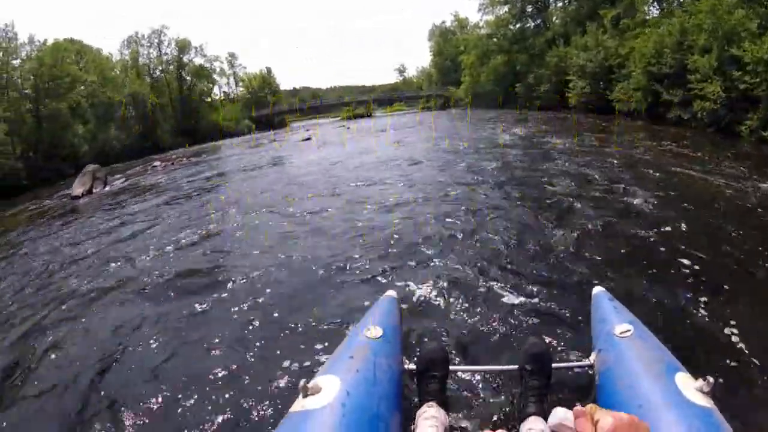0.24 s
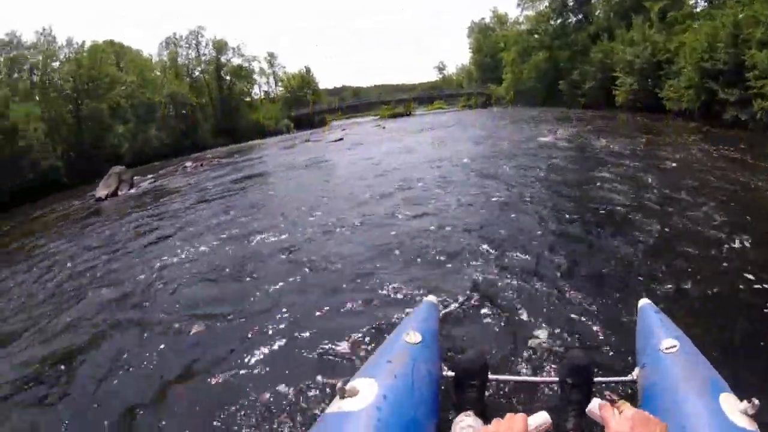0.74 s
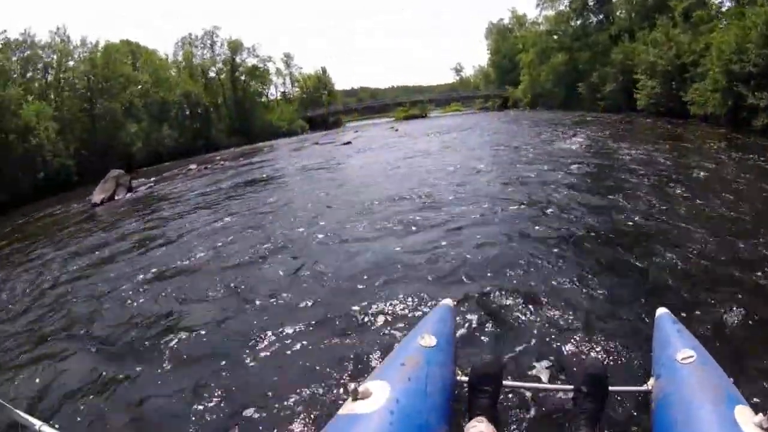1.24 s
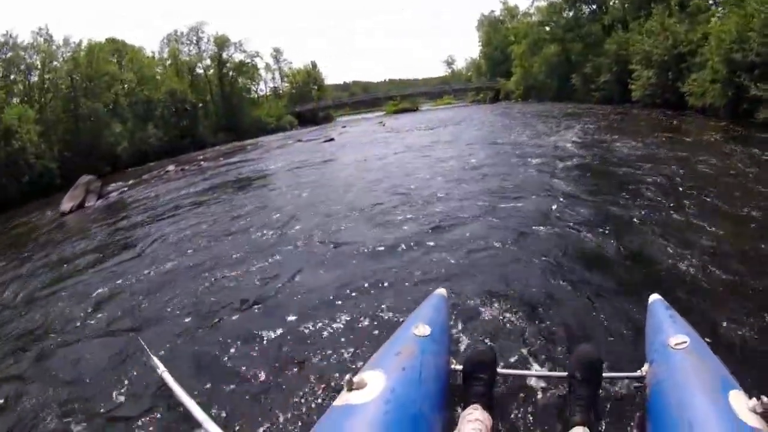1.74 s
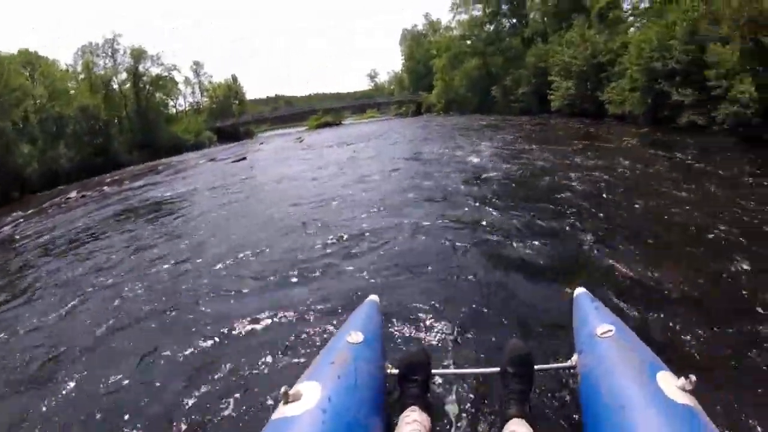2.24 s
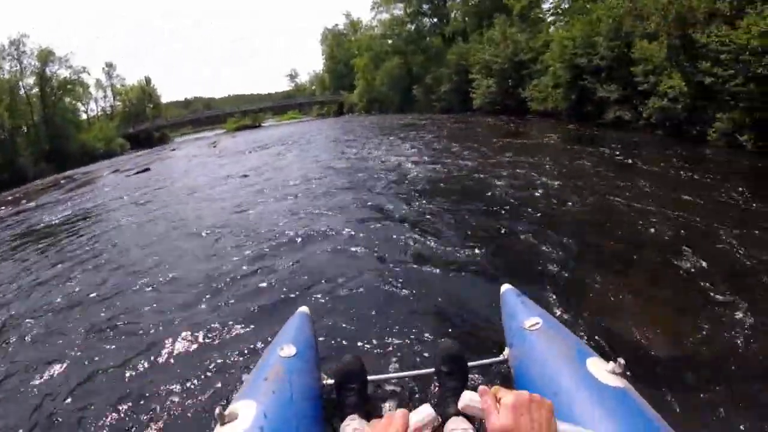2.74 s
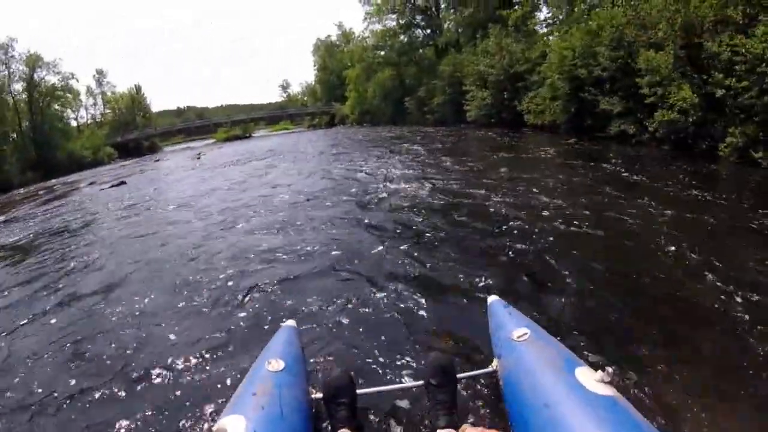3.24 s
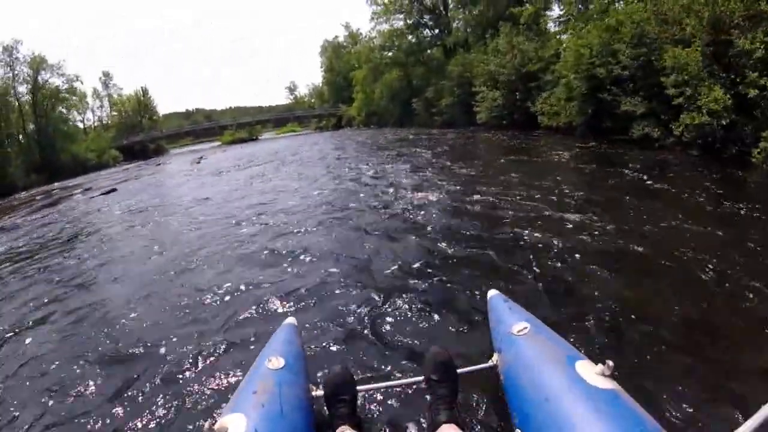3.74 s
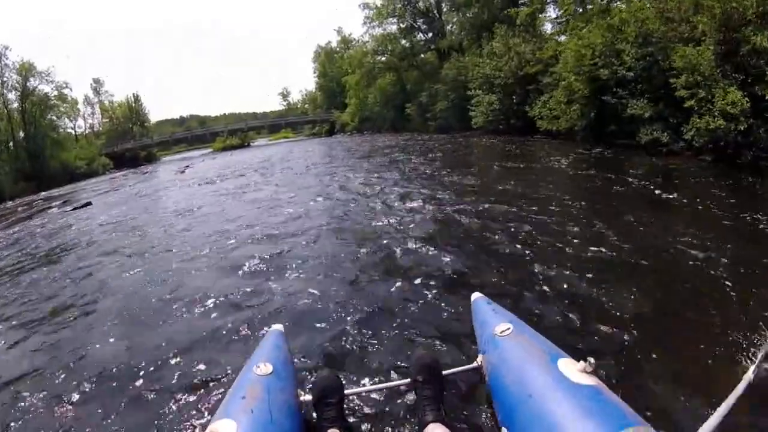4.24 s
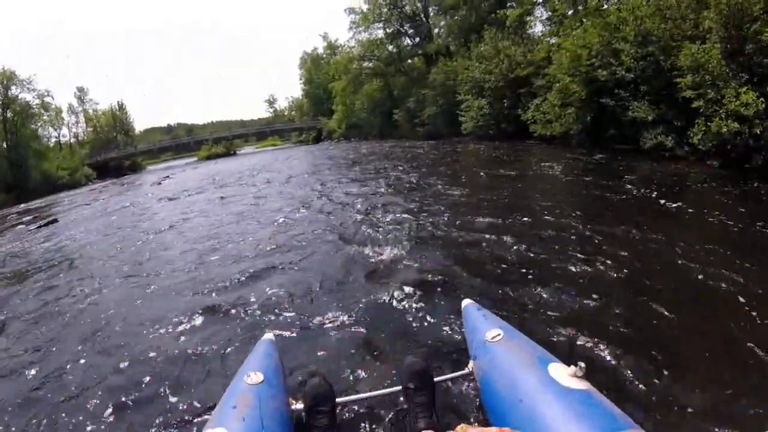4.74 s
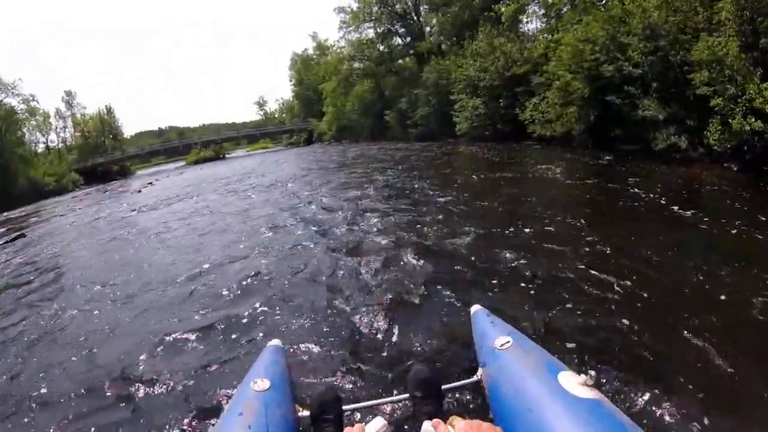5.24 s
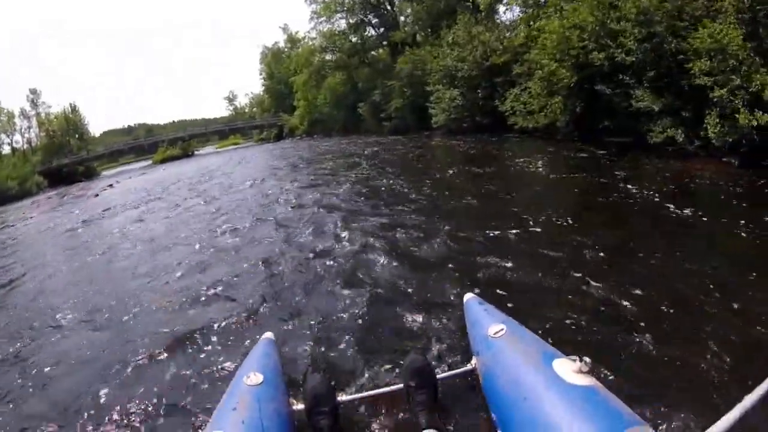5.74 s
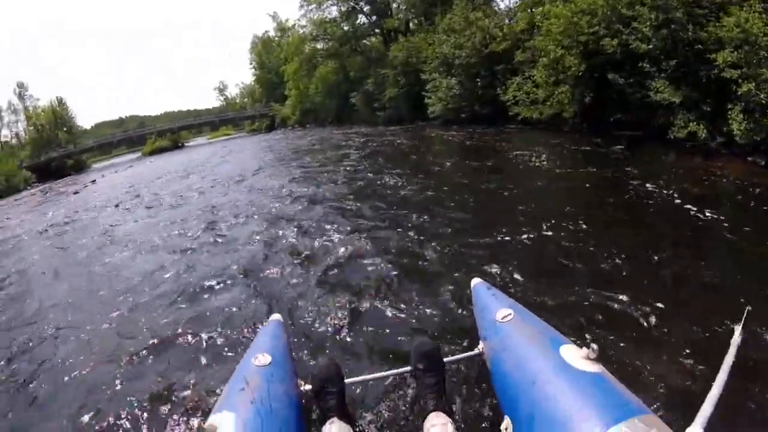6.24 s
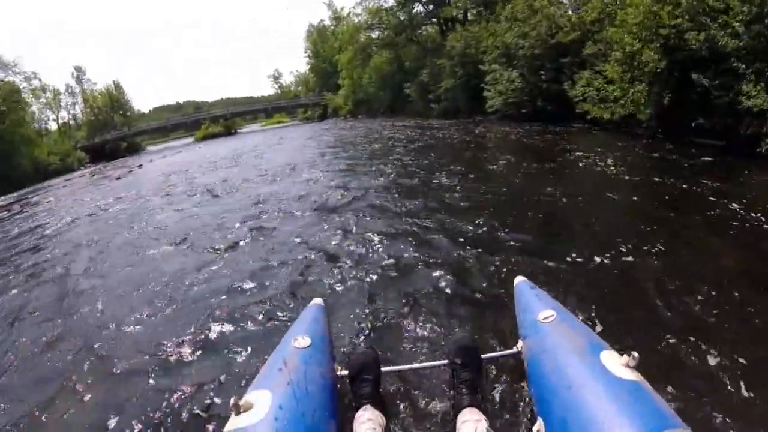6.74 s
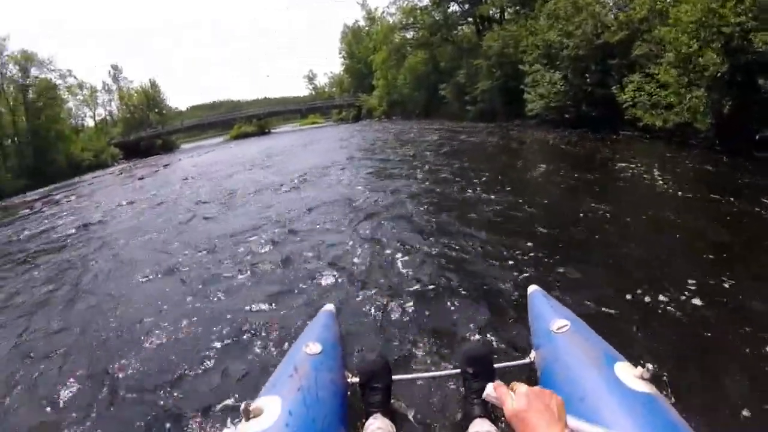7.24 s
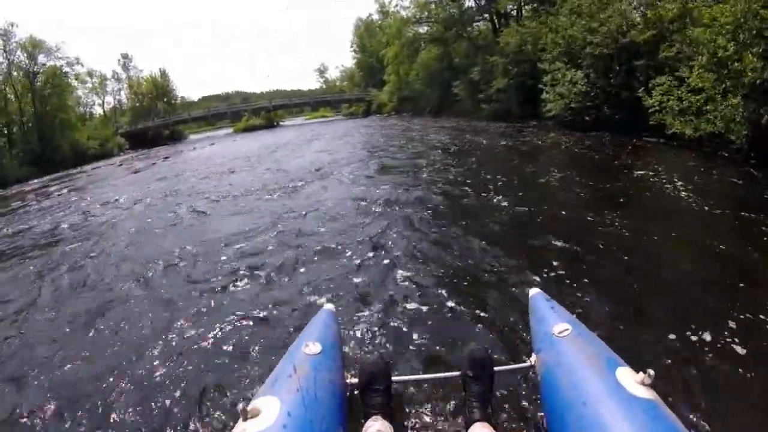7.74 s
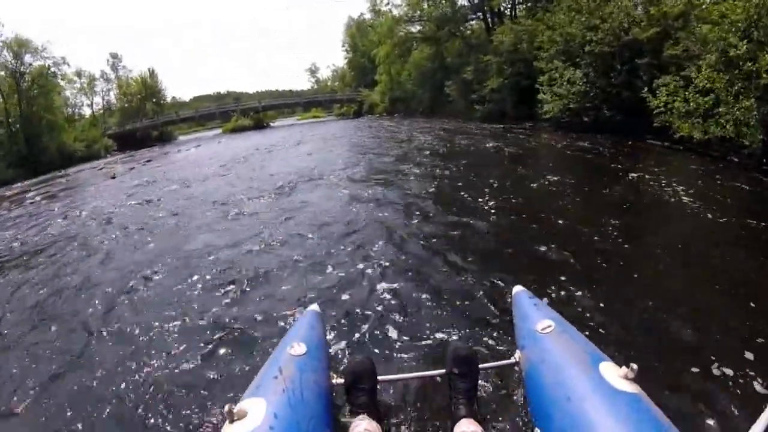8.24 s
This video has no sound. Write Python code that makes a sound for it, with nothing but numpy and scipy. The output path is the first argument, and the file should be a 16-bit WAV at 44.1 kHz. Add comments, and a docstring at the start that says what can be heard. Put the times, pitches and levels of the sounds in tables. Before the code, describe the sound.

Water gurgles, plops and ticks against a drifting inflatable boat over steady rushing current, with rumbling wind gusts and one small double click from an oar fitting.

```python
"""An even river rush, a low wind rumble and the first wavelets lapping an inflatable boat are heard at once.
Bubbles ring to make the gurgles, plops and crackling spray, most of all in one choppy run near six seconds.
Short noise bursts make slaps and near drops; the drops also ring a camera housing between about 5 and 6 kHz.
An oar fitting clicks once, as two quick contacts. The rush is patchy noise; the wind is low noise in gusts."""
import sys
import numpy as np
from scipy import signal
from scipy.fft import rfft, irfft, next_fast_len
from scipy.io import wavfile
from scipy.ndimage import uniform_filter1d, map_coordinates

SR = 44100
rng = np.random.default_rng(int(sys.argv[2]) if len(sys.argv) > 2 else 0)


def master(y):
    """Save y as 16-bit WAV."""
    cut = np.clip(np.atleast_2d(y).T, -1, 1)
    pcm = np.round(cut * 32767)  # scale
    wavfile.write(sys.argv[1], SR, pcm.astype(np.int16))


N = 374966  # length in samples, about 8.5 s

# In these tables, "relative" levels are shifted or rescaled further on.
# choppiness of the water round the boat: t/s, relative level/dB
CHOPPINESS = [(0, -55.5), (.3, -56.5), (.65, -54.5), (1.1, -60), (1.8, -59), (2.8, -65.5), (3.5, -61.5),
              (4.5, -58), (5.1, -56.5), (5.45, -57), (5.8, -56), (6.15, -46.5), (6.5, -51.5), (6.9, -53.5),
              (7.3, -55.5), (7.6, -53.5), (8.0, -59), (8.5, -58.5)]
# wavelets breaking on the pontoons: t/s of the peak, length/s,
# then relative level/dB of large bubbles, of small bubbles and of spray
WAVELETS = [(0.098, 0.13, -49.5, -45.5, -46.5), (0.418, 0.047, -46, -45, -47),
            (0.492, 0.057, -69, -47, -47.5), (0.584, 0.044, -71, -49, -48), (0.86, 0.068, -53, -48, -56),
            (1.29, 0.036, -53, -47, -48.5), (1.476, 0.031, -46.5, -47.5, -51),
            (1.557, 0.075, -53.5, -50, -51.5), (1.705, 0.18, -53, -54, -69),
            (1.894, 0.18, -48, -54.5, -53.5), (2.29, 0.06, -48, -60, -52.5),
            (2.527, 0.028, -61, -54.5, -51.5), (3.33, 0.061, -54, -62, -58),
            (3.42, 0.16, -57, -51.5, -54.5), (4.01, 0.13, -70, -51, -49), (4.213, 0.057, -53, -65, -45.5),
            (4.36, 0.027, -47.5, -58, -48), (4.505, 0.051, -48.5, -53, -50.5),
            (4.91, 0.064, -51.5, -46.5, -46), (5.03, 0.1, -55, -52.5, -48), (5.396, 0.036, -71, -75, -43),
            (5.556, 0.081, -56, -47.5, -44.5), (5.717, 0.06, -47, -49, -43), (5.784, 0.068, -40, -41, -40),
            (5.922, 0.041, -60, -45, -36.5), (5.975, 0.025, -34.5, -36.5, -33.5),
            (6.048, 0.083, -41, -44, -41.5), (6.17, 0.068, -46, -50, -46), (6.267, 0.15, -42, -41.5, -39.5),
            (6.53, 0.027, -57, -47, -42), (6.64, 0.052, -42.5, -43.5, -42.5),
            (6.722, 0.046, -40, -41.5, -39), (6.766, 0.04, -39, -42, -44), (7.003, 0.072, -43.5, -41, -42),
            (7.148, 0.067, -43, -40, -39.5), (7.422, 0.094, -51.5, -48, -42),
            (7.46, 0.099, -45, -44.5, -57), (7.643, 0.02, -46, -60, -46), (7.814, 0.028, -49, -50, -43.5),
            (7.872, 0.068, -45, -48, -49), (8.145, 0.14, -49, -58, -48.5), (8.357, 0.09, -55, -59, -51)]
# single bubbles, large and small, that stand out: t/s, f/Hz at the start, relative level/dB,
# life/cycles, share by which the pitch rises in that life
PLOPS = [(.030, 654, -29.5, 4.8, .15), (.122, 783, -37.5, 11, .1), (.4015, 1470, -37, 9.2, 0.092),
         (.493, 2080, -32, 16, 0.31), (0.543, 1900, -30, 8.4, .15), (.576, 3180, -42, 16, 0.13),
         (0.587, 1730, -40, 22, .05), (.596, 1850, -38, 12, .15), (.733, 726, -36.5, 11, .08),
         (.916, 696, -30.5, 8.3, 0.073), (0.916, 1130, -38.5, 11, .1), (1.490, 700, -31, 5.7, .15),
         (1.553, 477, -42, 40, .02), (1.560, 590, -34, 8.3, 0.19), (1.965, 1250, -38, 13, 0.058),
         (2.041, 1090, -37, 13.5, .4), (2.298, 1026, -40, 12, .1), (3.396, 3500, -41, 14, .15),
         (3.760, 613, -42.5, 24, 0.084), (3.968, 813, -39, 22, 0.13), (4.202, 400, -27.5, 2.9, .15),
         (4.261, 346, -36.5, 12.4, .03), (5.583, 1080, -32, 12, 0.28), (5.597, 1260, -26.5, 6.3, .05),
         (5.783, 604, -28, 9.5, 0.11), (5.799, 628, -17.5, 4.6, 0.22), (5.944, 262, -19.5, 2.3, 0.12),
         (5.95, 1280, -22.5, 10.6, 0.082), (5.963, 643, -27.5, 11.6, .05), (6.160, 546, -23.5, 3.7, 0.22),
         (6.227, 700, -32, 17, 0.045), (6.245, 394, -23, 4.3, 0.27), (6.278, 340, -37.5, 17, .1),
         (6.344, 1340, -19, 5.3, 0.11), (6.344, 2170, -18.5, 5.1, .2), (6.394, 3140, -31, 12, .2),
         (6.468, 1750, -41, 24, .3), (6.511, 743, -37, 19, 0.3), (6.522, 1080, -39, 14, .3),
         (6.535, 1380, -31.5, 17, 0.29), (6.550, 2150, -35, 14, .35), (6.562, 1650, -31, 8.2, .2),
         (6.645, 1004, -32, 19, 0.058), (6.712, 462, -30, 9.4, .05), (6.724, 2680, -32, 14, 0.14),
         (6.781, 577, -35, 13, .05), (7.007, 2000, -35, 19, 0.22), (7.110, 570, -34, 19, 0.14),
         (7.128, 1530, -34.5, 28, 0.26), (7.446, 970, -32, 11, .15), (7.483, 600, -31.5, 7, .15),
         (7.507, 1144, -34, 18, 0.81), (7.542, 513, -33.5, 9.9, .08), (7.572, 990, -38, 11, 0.33),
         (7.874, 503, -34.5, 15, .05), (7.910, 605, -31, 8.4, 0.13), (8.399, 665, -30, 8.9, .03)]
# water smacking the pontoons: t/s, middle of the band f/Hz, peak level/dB, time to fall 60 dB/s
SLAPS = [(0.4256, 3170, -29.5, 0.008), (1.860, 890, -29.5, 0.027), (4.333, 2000, -34, .018),
         (5.298, 3000, -36.5, .012), (5.7003, 4260, -32.5, 0.011), (5.928, 3500, -29, .012),
         (5.946, 790, -24, 0.017), (5.962, 3300, -24, .016), (6.278, 2600, -31, 0.016),
         (6.3435, 1900, -23, 0.01), (7.123, 1500, -32, 0.033)]
# drops landing close by: t/s, relative level/dB
DROPS = [(.426, -38), (.4895, -32), (.544, -41), (1.229, -43), (1.2425, -34), (1.305, -36), (1.539, -40),
         (1.989, -40), (2.1685, -37), (3.509, -43), (3.692, -40), (4.021, -42), (4.269, -38), (4.333, -39),
         (4.362, -33.5), (4.798, -38.5), (4.916, -29.5), (4.9555, -35), (5.2615, -35), (5.299, -39),
         (5.678, -32), (5.701, -36), (5.721, -32.5), (5.894, -40), (5.914, -39), (5.947, -20),
         (5.9625, -23), (5.9675, -31), (5.988, -30), (6.279, -29), (6.344, -31), (6.4725, -32.5),
         (6.627, -31), (6.717, -29), (7.059, -33.5), (7.125, -30), (7.164, -30), (7.729, -35),
         (8.118, -36.5), (8.379, -34)]
# ringing of the camera housing: f/Hz, relative level/dB, time to fall 60 dB/s
HOUSING_MODES = [(4970, 13.5, 0.006), (5340, 6.5, 0.011), (5717, 4.5, 0.023)]
# contacts of the oar fitting: t/s, relative level/dB
CLICKS = [(3.1315, -12), (3.1416, -1)]
# ringing of the oar fitting: f/Hz, relative level/dB, time to fall 60 dB/s
FITTING_MODES = [(1470, -30, 0.012), (5450, -30, 0.018), (5950, -29, 0.016), (7040, -40, 0.014),
                 (9300, -48, .02), (11060, -41, 0.02)]
# strength of the breeze at the microphone: t/s, relative level/dB
BREEZE = [(0, -41), (.6, -45.5), (1.0, -46), (1.75, -50), (2.1, -43.5), (2.45, -37.5), (2.7, -46.5),
          (3.05, -41.5), (3.35, -49), (3.8, -45), (4.55, -44), (5.3, -41), (5.8, -43), (6.3, -39),
          (6.8, -39.5), (7.1, -44.5), (7.75, -36.5), (8.5, -40)]
# gusts that thump the microphone: t/s of the peak, length/s,
# relative level/dB of the slow buffet and of the faster eddies
GUSTS = [(0.302, 0.044, -34, -54), (0.545, 0.051, -35.5, -55), (0.714, 0.11, -40.5, -48),
         (1.23, .05, -59, -66), (1.575, 0.019, -36.5, -50), (1.902, 0.034, -34, -33),
         (2.084, 0.055, -46, -37.5), (2.156, 0.03, -31, -36), (2.25, 0.033, -30, -57),
         (2.288, 0.035, -50, -45), (2.446, 0.046, -34, -58), (2.768, 0.035, -31, -51),
         (2.943, 0.032, -26, -34), (3.16, 0.045, -35, -44), (3.688, 0.056, -34, -46.5),
         (3.915, 0.08, -35, -44), (4.246, 0.033, -33, -51), (4.412, 0.019, -34.5, -37),
         (4.806, 0.064, -28, -37.5), (4.868, 0.082, -28.5, -41.5), (5.245, 0.05, -28, -30.5),
         (5.349, 0.084, -29, -33.5), (5.4, 0.044, -21, -29.5), (5.58, 0.13, -44, -38.5),
         (5.672, 0.034, -31.5, -35), (5.917, 0.028, -34, -37.5), (6.057, 0.054, -42, -32.5),
         (6.197, 0.042, -39, -38), (6.293, 0.033, -29, -31.5), (6.446, 0.027, -31, -47),
         (6.686, 0.051, -28.5, -33.5), (7.478, 0.034, -29, -52), (7.623, .035, -32, -45),
         (7.70, 0.036, -25, -49), (7.756, .04, -26, -33), (7.841, 0.053, -36, -34.5),
         (7.908, 0.037, -25.5, -31), (7.941, 0.03, -27.5, -28), (8.046, .04, -48, -36.5),
         (8.11, 0.039, -25.5, -38), (8.204, 0.037, -40, -34.5), (8.258, 0.042, -24.5, -44),
         (8.355, .03, -38, -48)]
# tone colours, from large bubbles to wind eddies: f/Hz, relative level/dB for each Hz of width
GURGLE_COLOUR = [(150, -14), (300, -8.5), (450, -7.5), (650, -4), (1100, -10.5), (1600, -8.5),
                 (3000, -42.5)]
TRICKLE_COLOUR = [(600, -12), (1250, -3.5), (2400, -2), (3900, -10), (6000, -11.5), (9000, -52)]
SPRAY_COLOUR = [(2000, -26), (3300, -10), (4100, -12), (4900, 3.5), (5500, 5), (6000, 3), (6600, -11),
                (8000, -13), (10700, -29), (12000, -36)]
MIST_COLOUR = [(4500, -22), (6500, -2), (8000, -5), (9500, -7), (11000, -11), (12500, -12)]
RUSH_COLOUR = [(120, 1.5), (270, -1.5), (380, -0.5), (600, 0.5), (850, 2), (1300, -3.5), (2500, -9),
               (4100, -20), (5000, -10), (5900, -11), (6700, -22.5), (10600, -33.5), (13500, -22.5)]
BUFFET_COLOUR = [(8, -12), (25, 1), (45, 1.5), (80, -5), (115, -24), (200, -35.5), (400, -83)]
EDDY_COLOUR = [(40, -27), (90, 5.5), (130, -2.5), (180, -10), (280, -20), (600, -58), (1500, -67)]
# the camera's treble response: f/Hz, gain level/dB
TREBLE = [(10900, 0), (11600, -11), (13700, -18)]

CALM_DB = -55  # choppiness of ordinary water
RISE_SHARE, FALL_SHARE = 0.49, 0.73  # parts of a wavelet's length before and after its peak
SWELL_CYCLES = 1.1  # cycles a bubble takes to start ringing
PLOP_DB = 2.2  # lift for a plop's ring, since it decays while it swells
SLAP_SPAN = 1.8  # a slap's band reaches this factor either side of its middle
SPLASH_DB = -43.5  # spray of a typical splash
MIST_DB, MIST_GROWTH = -67.5, 0.79  # hiss in a typical splash; its dB per dB of spray
RIFFLE_DB, RIFFLE_GROWTH = -50.5, 0.036  # rush by ordinary water; its dB per dB of choppiness
EDDY_DB, EDDY_GROWTH = -7.5, 1.43  # eddies relative to a mean breeze; their dB per dB of breeze
GUST_SHARE = 0.38  # part of a gust's length on either side of its peak
TOP_HZ = 13700  # the camera keeps nothing from here up


def amp(db):
    """Turn decibels into a plain multiplier."""
    return 10 ** (np.asarray(db) / 20)


def decibels(power):
    """Turn a power into decibels."""
    return 10 * np.log10(power + 1e-20)


def unit(x):
    """Scale a signal to an rms (average strength) of 1."""
    return x / np.sqrt(np.mean(x ** 2) + 1e-20)


def curves(rows):
    """Draw straight lines between table rows: one value per sample for each column after the time."""
    times, *columns = np.transpose(rows)
    return [np.interp(np.arange(N) / SR, times, column) for column in columns]


def wobble(rate):
    """Draw a smooth random curve through this many random points a second."""
    points = rng.standard_normal(int(N * rate / SR) + 4)
    return map_coordinates(points, [np.arange(N) * rate / SR])


def swells(times, lengths, db, rise, fall):
    """Add up the power of bell-shaped swells; rise and fall are shares of each length."""
    t, power = np.arange(N) / SR, np.zeros(N)
    for peak_s, length, level in zip(times, lengths, db):
        near = slice(*np.searchsorted(t, [peak_s - 4 * length, peak_s + 4 * length]))
        age = (t[near] - peak_s) / length
        share = np.where(age < 0, rise, fall)
        power[near] += amp(level) ** 2 * np.exp(-(age / share) ** 2)
    return power


def filtered(x, response):
    """Multiply the frequencies of x by a response."""
    m = next_fast_len(N + SR // 2)
    return irfft(rfft(x, m) * response(np.fft.rfftfreq(m, 1 / SR)), m)[:N]


def coloured(x, spectrum):
    """Give x a tone colour, at rms 1, with a filter that never sounds ahead of its input."""
    size = 8192
    hz, db = np.transpose(spectrum)
    log_hz = np.log(np.fft.rfftfreq(size, 1 / SR) + 1)  # the 1 avoids log of zero
    gain = amp(np.interp(log_hz, np.log(hz), db))
    # folding the cepstrum forward in time gives the minimum-phase filter
    cepstrum = irfft(np.log(gain))
    cepstrum[1:size // 2] *= 2
    cepstrum[size // 2 + 1:] = 0
    impulse = irfft(np.exp(rfft(cepstrum)))
    return unit(signal.fftconvolve(x, impulse)[:N])


def patchy_noise(patchy_db):
    """Make white noise with patches of random gain in time and frequency."""
    noise = signal.stft(rng.standard_normal(N), nperseg=512)[2]
    patches = uniform_filter1d(rng.standard_normal(noise.shape), size=5, axis=0)
    patches = uniform_filter1d(patches, size=6, axis=1)
    return signal.istft(noise * amp(patchy_db * unit(patches)), nperseg=512)[1][:N]


def placed(times, sounds):
    """Add up short sounds (rows), each starting at its time."""
    index = np.round(times * SR).astype(int)[:, None] + np.arange(sounds.shape[1])
    return np.bincount(index.ravel(), sounds.ravel(), N)[:N]


def bubbles(times, hz, strength, cycles, rise, size):
    """Air pockets ring, lose 20 dB in their life and rise in pitch as they near the surface."""
    turns = hz[:, None] * np.arange(size) / SR
    age = turns / cycles[:, None]
    swell = 1 - np.exp(-turns / SWELL_CYCLES)
    phase = 2 * np.pi * turns * (1 + rise * age / 2)
    return placed(times, strength[:, None] * swell * amp(-20 * age) * np.sin(phase))


def ring(modes, t):
    """A struck object sounds several fading tones, each with a new random phase."""
    return sum(amp(db - 60 * t / t60) * np.sin(2 * np.pi * (hz * t + rng.random()))
               for hz, db, t60 in modes)


def pontoons():
    """Breaking wavelets swell with large bubbles, small bubbles, fizzing spray and fine hiss together."""
    chop_db, = curves(CHOPPINESS)
    peak_s, length, gurgle_db, trickle_db, spray_db = np.transpose(WAVELETS)
    lapping_db = chop_db - CALM_DB + 0.83 * wobble(16)  # slight ripples between the wavelets
    slosh_db = 1.96 * wobble(45)  # bubbles and spray flutter together

    def level(calm_db, growth, peak_db):
        """Add breaking wavelets to the lapping between them; the result is in dB."""
        breaking = swells(peak_s, length, peak_db, RISE_SHARE, FALL_SHARE)
        lapping = amp(calm_db + growth * lapping_db) ** 2
        return decibels(lapping + breaking) + slosh_db

    large_db = level(calm_db=-58, growth=0.47, peak_db=gurgle_db - 2.9)
    small_db = level(calm_db=-56.5, growth=1.0, peak_db=trickle_db - 5.0)
    fizz_db = level(calm_db=-54.5, growth=1.15, peak_db=spray_db - 3.5)
    large = gurgle(large_db, GURGLE_COLOUR, low_hz=308.0, high_hz=1406, spread_db=3.0,
                   churn=0.41, count=1800, size=1800)
    small = gurgle(small_db, TRICKLE_COLOUR, low_hz=1101, high_hz=4530, spread_db=5.0,
                   churn=0.54, count=3600, size=600)
    spray = gurgle(fizz_db, SPRAY_COLOUR, low_hz=3520, high_hz=10660, spread_db=8.5,
                   churn=0.5, count=16000, size=140)
    mist_db = MIST_DB + MIST_GROWTH * (fizz_db - SPLASH_DB)
    mist = amp(mist_db) * coloured(patchy_noise(patchy_db=3.0), MIST_COLOUR)
    return large + small + spray + mist


def gurgle(level_db, colour, low_hz, high_hz, spread_db, churn, count, size):
    """Bubbles of mixed strength ring in a swarm; in rough water they merge into a churning wash."""
    when, bore, life, nearness = rng.random((count, 4)).T
    hz = low_hz * (high_hz / low_hz) ** bore
    spread = np.clip(rng.standard_normal(count), -2, 2.3)
    strength = amp(spread_db * spread) * np.sqrt(hz / low_hz)
    swarm = bubbles(when * N / SR, hz, strength, 4 + 13 * life, rise=0.25 * nearness[:, None], size=size)
    wash = churn * amp(0.7 * (level_db - level_db.mean()))
    mixture = coloured(swarm, colour) + wash * coloured(rng.standard_normal(N), colour)
    return amp(level_db) * mixture / np.sqrt(1 + wash ** 2)  # more wash, same overall level


def plops():
    """Single bubbles, large and small, stand out as plops and chirps, each rising in pitch by its own share."""
    s, hz, db, cycles, rise = np.transpose(PLOPS)
    return bubbles(s, hz, amp(db + PLOP_DB), cycles, rise=rise[:, None], size=4000)


def slaps():
    """A wave's face hits a pontoon flat: a sudden wet smack made of band-limited noise."""
    s, hz, db, t60 = np.transpose(SLAPS)
    t = np.arange(SR // 25) / SR
    bursts = rng.standard_normal((len(s), len(t))) * amp(-60 * t / t60[:, None])
    bands = np.outer(hz, [1 / SLAP_SPAN, SLAP_SPAN])
    smacks = np.array([signal.lfilter(*signal.butter(2, band, 'band', fs=SR), burst)
                       for band, burst in zip(bands, bursts)])
    return placed(s, amp(db)[:, None] * smacks / abs(smacks).max(axis=1, keepdims=True))


def drops():
    """Each near drop is a tiny crack of noise that sets the housing ringing."""
    s, db = np.transpose(DROPS)
    t = np.arange(SR // 40) / SR
    cracks = amp(-60 * t / 0.031) * rng.standard_normal((len(s), len(t)))
    cracks = signal.lfilter(*signal.butter(3, 6500, fs=SR), cracks)
    rings = np.array([ring(HOUSING_MODES, t) for _ in s])
    ticks = (rings + cracks) * (1 - np.exp(-t / 0.00026))  # softened start
    return placed(s, amp(db + 4.0)[:, None] * ticks / abs(ticks).max(axis=1, keepdims=True))


def oar_click():
    """A metal fitting touches, then takes up its slack: each contact is a dry crack and a short ring."""
    s, db = np.transpose(CLICKS)
    t = np.arange(SR // 10) / SR
    noise = rng.standard_normal((len(s), len(t)))
    cracks = signal.lfilter(*signal.butter(1, 2500, fs=SR), noise) * amp(-32 - 60 * t / 0.028)
    return placed(s, amp(db)[:, None] * (cracks + amp(-4.5) * ring(FITTING_MODES, t)))


def riffle():
    """Countless distant bubbles merge into an even rush, a little louder where the water is choppy."""
    chop_db, = curves(CHOPPINESS)
    level_db = RIFFLE_DB + RIFFLE_GROWTH * (chop_db - CALM_DB)
    return amp(level_db) * coloured(patchy_noise(patchy_db=2.0), RUSH_COLOUR)


def wind():
    """Slow pressure lumps push the microphone; faster eddies grow with the breeze, and gusts thump on top."""
    breeze_db, = curves(BREEZE)
    s, length, push_db, thud_db = np.transpose(GUSTS)
    mean_db, lumps_db = breeze_db.mean(), 1.17 * wobble(22)
    swirl_db = mean_db + EDDY_DB + EDDY_GROWTH * (breeze_db - mean_db) + 3.0 * wobble(36)
    pushes = swells(s, length, push_db - 0.7, GUST_SHARE, GUST_SHARE)
    thuds = swells(s, length, thud_db + 0.33, GUST_SHARE, GUST_SHARE)
    buffet_power = amp(breeze_db + lumps_db + 2.0) ** 2 + pushes
    eddy_power = amp(swirl_db + lumps_db) ** 2 + thuds
    buffet = np.sqrt(buffet_power) * coloured(rng.standard_normal(N), BUFFET_COLOUR)
    eddies = np.sqrt(eddy_power) * coloured(rng.standard_normal(N), EDDY_COLOUR)
    return buffet + eddies


def scene():
    """Add the water near the boat, the oar click, the open riffle and the wind, as one channel."""
    near_water = pontoons() + plops() + slaps() + drops()
    return (near_water + oar_click() + riffle() + wind())[None]


def record(dry):
    """The camera dulls the highest treble and keeps nothing above its band limit."""
    def response(hz):
        return amp(np.interp(hz, *np.transpose(TREBLE))) * (hz < TOP_HZ)

    return filtered(dry[0], response)[None]


dry = scene()
out = record(dry)
master(out)
```